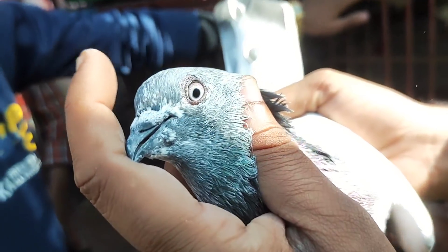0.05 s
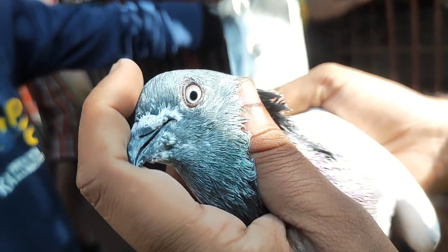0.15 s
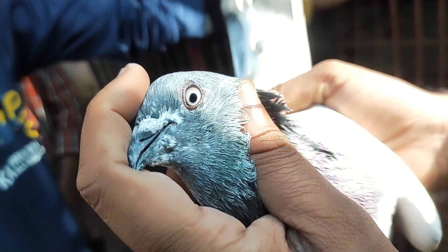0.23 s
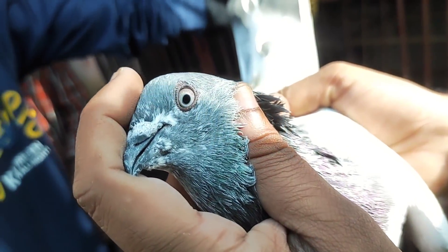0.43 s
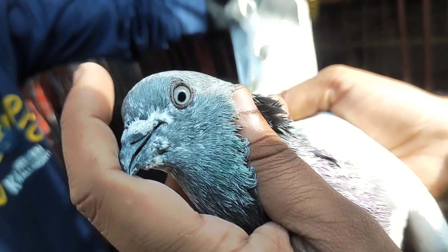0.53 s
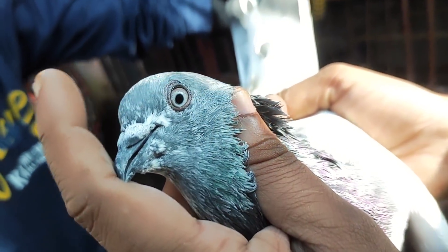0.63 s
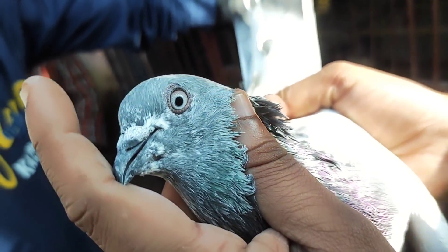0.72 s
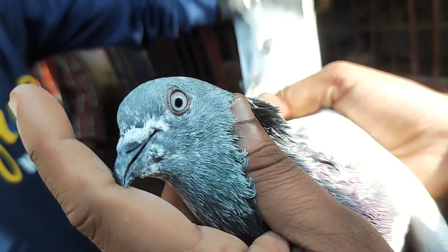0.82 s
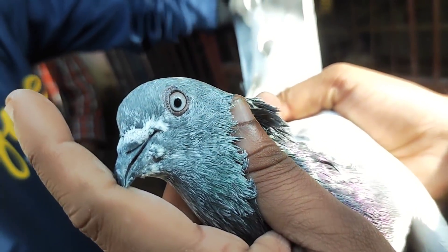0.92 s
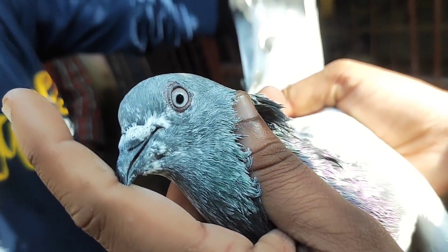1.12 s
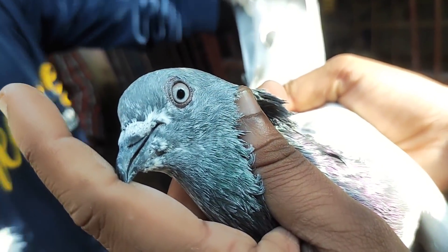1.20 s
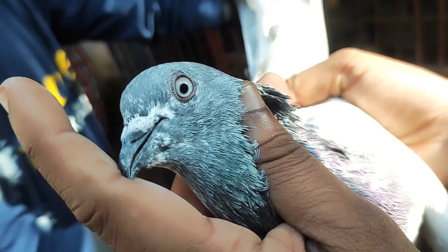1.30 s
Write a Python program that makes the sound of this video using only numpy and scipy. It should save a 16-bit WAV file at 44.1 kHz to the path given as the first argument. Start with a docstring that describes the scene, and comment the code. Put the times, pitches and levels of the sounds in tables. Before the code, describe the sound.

A pigeon coos once, a short low hoot falling into hoarse throaty notes, while fingers rub and snap its feathers; a faint thin call ends it, close handheld microphone in a loft.

```python
"""In a loft, a pigeon held in the hand coos briefly: a short hoot, then low throaty notes and a hoarse murmur.
A fainter hoot and a thin, higher call come later. Calls are trembling sines with a diffuse loft tail.
Fingers rub and snap the feathers: grainy filtered noise and quickly dying bursts.
The hand-held microphone rumbles: low noise under a level curve. A faint rustle and soft hiss lie behind."""
import sys
import numpy as np
from scipy import signal
from scipy.fft import rfft, irfft
from scipy.io import wavfile

SR = 44100
rng = np.random.default_rng(int(sys.argv[2]) if len(sys.argv) > 2 else 0)


def waveform_to_disk(signal):
    """Save audio, clipped to [-1, 1], as 16-bit WAV at the path in sys.argv[1]."""
    frames = np.transpose(np.atleast_2d(signal))
    scaled = np.clip(frames, -1, 1) * 32767
    samples = np.round(scaled).astype(np.int16)
    wavfile.write(sys.argv[1], SR, samples)


N = 59535
T = np.arange(N) / SR


def from_db(db):
    """Decibels to amplitude gain."""
    return 10 ** (np.asarray(db) / 20)


def rms_one(x):
    """Scale to unit power."""
    return x / np.sqrt(np.mean(x ** 2) + 1e-20)


def in_time(rows):
    """Interpolate each column of a (time, values...) curve at every sample."""
    time_s, *columns = np.transpose(rows)
    return [np.interp(T, time_s, column) for column in columns]


def coloured(x, points):
    """Filter by a spectrum of (frequency [Hz], gain [dB]) points, linear in dB over log frequency."""
    hz, db = np.transpose(points)
    bins_hz = np.maximum(np.arange(N // 2 + 1) * SR / N, 1)
    gain_db = np.interp(np.log(bins_hz), np.log(hz), db)
    return irfft(rfft(x) * from_db(gain_db), N)


def stereo_noise(spectrum, texture=1):
    """Unit-power noise with a given spectrum and grain, wider towards the treble."""
    # Stereo width: (frequency [Hz], side minus mid [dB])
    side_gain = [(30, -28.5), (60, -23.5), (130, -12), (500, -4.5), (3000, -6.5), (10000, -6.5)]
    mid, side = rng.standard_normal((2, N)) * texture
    stereo = mid + coloured(side, side_gain) * [[1], [-1]]
    return rms_one(coloured(stereo, spectrum))


def drift(corner_hz):
    """Smooth random wander of unit power: noise through a double one-pole low-pass."""
    r = np.exp(-2 * np.pi * corner_hz / SR)
    wander = signal.lfilter([1], [1, -2 * r, r * r], rng.standard_normal(2 * N))
    return rms_one(wander[N:])  # first half is settling


def gate(start_s, length_s, attack_s, release_s):
    """Rounded attack, hold and release; the release follows the length."""
    rise = np.clip((T - start_s) / attack_s, 0, 1)
    fall = np.clip(1 - (T - start_s - length_s) / release_s, 0, 1)
    return np.sin(np.pi / 2 * rise * fall) ** 2


def tone(hz, rough):
    """Unit-power sine whose pitch and strength tremble with roughness."""
    tremble_hz, jitter = 37.5, 0.041  # corner of the wander; pitch fraction at roughness 1
    pitch_hz = hz * (1 + jitter * rough * drift(tremble_hz))
    phase = 2 * np.pi * np.cumsum(pitch_hz) / SR
    return rms_one(np.sin(phase) * (1 + rough * drift(tremble_hz)))


def hoots():
    """Near-pure tones that open softly, sag in pitch as they swell, then drop to a quiet hum."""
    # Hoots: (start [s], length [s], start pitch [Hz], end pitch [Hz], level [dB],
    # lead-in [s], hum level [dB])
    hoot_rows = [(.125, .027, 394, 366, -32.5, .018, -53), (1.022, .029, 402, 392, -53.5, .06, -62)]
    attack_s, release_s, start_db = 0.015, 0.0086, -8.5
    lead_hz, lead_db = 420, -21.5  # level relative to the hoot
    hum_hz, hum_s, hum_release_s = 407, 0.0318, 0.0083
    out = np.zeros(N)
    for start_s, length_s, from_hz, to_hz, db, lead_s, hum_db in hoot_rows:
        end_s = start_s + length_s
        lead_start_s = start_s - lead_s
        hz = np.interp(T, [lead_start_s, start_s, end_s, end_s + hum_s], [lead_hz, from_hz, to_hz, hum_hz])
        lead = from_db(lead_db) * gate(lead_start_s, lead_s, attack_s, release_s)
        swell = from_db(np.interp(T, [start_s, end_s], [start_db, 0]))
        swell *= gate(start_s, length_s - release_s / 2, attack_s, release_s)
        hum = from_db(hum_db) * gate(start_s, length_s + hum_s, length_s, hum_release_s)
        out += (from_db(db) * (lead + swell) + hum) * tone(hz, rough=0.04)
    return out


def throaty_notes():
    """Short trembling notes, each a sine plus a second sine of twice the roughness."""
    # Notes: (start [s], length [s], pitch [Hz], level [dB], second pitch [Hz],
    # second level [dB], roughness [0-1])
    note_rows = [(0.197, 0.05, 272, -51, 425.6, -64, 0.01), (0.213, 0.057, 438.7, -56, 584, -57.5, .25),
                 (0.324, 0.032, 272, -52, 542, -54.5, 0.36), (0.389, 0.0073, 934, -60.5, 373, -73, .2),
                 (0.415, 0.0287, 460, -54, 938, -70.5, 0.42), (.46, 0.044, 557, -62.5, 950, -73, 0.7),
                 (0.452, .035, 390, -61.5, 284.5, -61.5, 0.4), (0.572, .04, 500, -66, 330, -62, 0.79)]
    attack_s, release_s = 0.013, 0.031
    out = np.zeros(N)
    for start_s, length_s, hz, db, second_hz, second_db, rough in note_rows:
        first = from_db(db) * tone(hz, rough)
        second = from_db(second_db) * tone(second_hz, 2 * rough)
        out += gate(start_s, length_s, attack_s, release_s) * (first + second)
    return out


def thin_call():
    """A wavering, broadly rising sine with a low undertone and a halo of hoarse noise."""
    # Call: (time [s], pitch [Hz], level [dB], undertone level [dB], halo level [dB])
    call_curve = [(1.13, 800, -78, -80, -73.5), (1.205, 802, -81, -86, -73),
                  (1.228, 833.5, -73, -71, -63.5), (1.243, 793, -60.5, -60, -65.5),
                  (1.253, 864, -48, -56, -73), (1.262, 882, -62, -64, -59), (1.272, 850, -66, -65, -65),
                  (1.287, 868, -51.5, -59, -62), (1.297, 928, -54.5, -56.5, -82),
                  (1.326, 907, -53, -65.5, -72), (1.345, 908, -72, -70, -80.5)]
    # Halo spectrum: (frequency [Hz], relative density [dB])
    halo_spectrum = [(400, -7), (540, 5), (680, -14), (850, 1.5), (1100, -0.5), (1300, -7), (1550, -0.5),
                     (1780, -3), (2100, -32), (4000, -48)]
    hz, db, under_db, halo_db = in_time(call_curve)
    call = from_db(db) * tone(hz, rough=0.13)
    undertone = from_db(under_db) * tone(274.1, rough=0.8)
    halo = from_db(halo_db) * rms_one(coloured(rng.standard_normal(N), halo_spectrum))
    return (call + undertone + halo) * (T > call_curve[0][0])


def loft(x):
    """Convolve with a delayed, decaying noise tail that differs at each ear."""
    t60_s, first_echo_s, tail_db = 0.39, 0.014, -7.5
    tail = rng.standard_normal((2, N)) * from_db(-60 * T / t60_s) * (T > first_echo_s)
    tail = rms_one(tail) / np.sqrt(N)  # unit energy per ear on average
    return from_db(tail_db) * signal.fftconvolve(x[None], tail, axes=1)[:, :N]


def feathers():
    """Barbs slip under the fingers as tiny grains over soft brushing; firm strokes rasp in a band."""
    # Rubbing: (time [s], crackle level before trim [dB], brushing level before trim [dB])
    rub_curve = [(.02, -77, -84), (.055, -70, -87), (.08, -59, -69), (.115, -59, -65), (.135, -58.5, -60),
                 (.3, -58, -65), (.44, -56.5, -59), (.53, -57, -59.5), (.55, -55.5, -60.5),
                 (.59, -54, -61.5), (.635, -56, -59.5), (.68, -68.5, -62), (.9, -76.5, -81),
                 (1.185, -76.5, -79), (1.203, -74, -64.5), (1.3, -79.5, -80), (1.35, -75, -62)]
    # Firm strokes: (start [s], length [s], brushing level [dB], rasp pitch [Hz], rasp level [dB])
    stroke_rows = [(.071, 0.0064, -66.5, 11700, -66), (0.126, 0.03, -65, 11200, -71),
                   (0.18, 0.014, -62, 11400, -60), (0.223, 0.022, -59.5, 8460, -58),
                   (0.249, 0.023, -66, 8900, -63), (0.281, 0.026, -61, 8650, -60),
                   (0.331, 0.062, -66.5, 8400, -64), (0.423, 0.023, -68, 11750, -58),
                   (0.457, 0.013, -66, 11200, -62), (0.491, 0.0093, -64, 10600, -57.5),
                   (0.583, 0.014, -62.5, 9900, -59), (.869, 0.0069, -66, 8170, -69.5),
                   (0.903, 0.01, -66.5, 7400, -68), (1.2, 0.0046, -66.5, 8500, -73),
                   (1.243, 0.0072, -67, 12400, -71)]
    # Spectra: (frequency [Hz], relative density [dB])
    crackle_spectrum = [(5000, -13.5), (7300, -12), (9300, 2), (10700, 2.5), (11800, 0.5), (13400, -7.5),
                        (14600, -50)]
    brush_spectrum = [(150, 8.5), (450, 12), (700, 1), (1200, 4.5), (2000, -1.5), (4500, -1.5),
                      (7000, -2.5), (12000, -32)]
    crackle_trim_db, brush_trim_db = -3.5, -6.5
    grains_per_s, grain_spread_db, smooth_share = 2500, 0.5, 1
    attack_s, release_s, rasp_width_hz = 0.0024, 0.014, 1070

    crackle_db, brush_db = in_time(rub_curve)
    grain_db = grain_spread_db * np.minimum(rng.exponential(1, N), 4)
    grains = (rng.random(N) < grains_per_s / SR) * from_db(grain_db)
    texture = rms_one(grains) + smooth_share
    crackle = from_db(crackle_db + crackle_trim_db) * stereo_noise(crackle_spectrum, texture)
    pressure = from_db(brush_db + brush_trim_db)
    for start_s, length_s, db, rasp_hz, rasp_db in stroke_rows:
        stroke = gate(start_s, length_s, attack_s, release_s)
        band = [(rasp_hz - 2 * rasp_width_hz, -40), (rasp_hz - rasp_width_hz / 2, 0),
                (rasp_hz + rasp_width_hz / 2, 0), (rasp_hz + 2 * rasp_width_hz, -30)]
        crackle += from_db(rasp_db) * stroke * stereo_noise(band, texture)
        pressure += from_db(db) * stroke
    return crackle + pressure * stereo_noise(brush_spectrum, texture)


def feather_snaps():
    """Feathers snap past the fingers: sudden decaying noise, in a high band plus a broad crack."""
    # Snaps: (time [s], starting level [dB], decay time constant [s])
    snap_rows = [(.076, -51, .005), (.2275, -52, .004), (.303, -50, .006), (.4342, -45, .003),
                 (.5578, -30.5, .0012), (.5622, -36, .0016), (.566, -47, .015), (.5728, -40, .0012),
                 (.615, -53, .009), (.872, -65, .004), (.91, -67, .006)]
    low_hz, high_hz, crack_db, side_share = 9360, 11320, -13.5, 0.25
    strength = np.zeros(N)
    for start_s, db, decay_s in snap_rows:
        strength += from_db(db) * (T >= start_s) * np.exp(-np.abs(T - start_s) / decay_s)
    mid, side = rng.choice([-1, 1], (2, N))
    burst = strength * (mid + side_share * side * [[1], [-1]])
    band = signal.butter(2, [low_hz, high_hz], "band", fs=SR, output="sos")
    ring = signal.sosfilt(band, burst + 1e-18)
    ring *= np.sqrt(SR / 2 / (high_hz - low_hz))  # make up the power lost to the band-pass
    return ring + from_db(crack_db) * burst


def handling_rumble():
    """Handling of the microphone: low-frequency noise under a level curve."""
    # Handling: (time [s], level before trim [dB])
    handling_curve = [(.02, -36.5), (.06, -41), (.095, -19), (.15, -37), (.21, -17), (.255, -31),
                      (.325, -15.5), (.385, -31.5), (.45, -33), (.52, -35.5), (.575, -34.5), (.64, -46),
                      (.9, -45), (1.35, -63)]
    # Rumble spectrum: (frequency [Hz], relative density [dB])
    rumble_spectrum = [(10, -16), (17, 12.5), (26, -7), (38, -21.5), (52, -26), (70, -34.5), (120, -51),
                       (300, -92)]
    trim_db = -2
    return from_db(in_time(handling_curve)[0] + trim_db) * stereo_noise(rumble_spectrum)


def background():
    """Steady filtered noise with a soft hiss, and a faint noise rustle that swells and fades."""
    # Spectra: (frequency [Hz], relative density [dB])
    air_spectrum = [(25, -1), (45, 6.5), (70, -8.5), (110, -16), (170, -16.5), (300, -26), (480, -31),
                    (750, -38.5), (1300, -39), (2200, -40), (4000, -39), (5300, -39), (6500, -47.5),
                    (9500, -43), (12000, -85), (15000, -53.5)]
    rustle_spectrum = [(150, 12), (400, 8), (700, -8), (1900, -3.5), (4300, -3), (5300, 3), (6000, -4.5),
                       (9500, -5.5), (14000, -19)]
    air_db, rustle_db = -50, -65.5
    start_s, length_s, fade_s = 0.708, 0.25, 0.093
    air = from_db(air_db) * stereo_noise(air_spectrum)
    rustle = from_db(rustle_db) * gate(start_s, length_s, fade_s, fade_s) * stereo_noise(rustle_spectrum)
    return air + rustle


def scene():
    """Calls with their loft tail, feathers, handling rumble and background."""
    calls = hoots() + throaty_notes() + thin_call()
    handling = feathers() + feather_snaps() + handling_rumble()
    return calls + loft(calls) + handling + background()


def record(dry):
    """Steep low-pass: 60 dB down from the stop-band edge upward."""
    stop_hz = 15700
    return signal.sosfilt(signal.cheby2(16, 60, stop_hz, fs=SR, output="sos"), dry)


dry = scene()
out = record(dry)
waveform_to_disk(out)
```